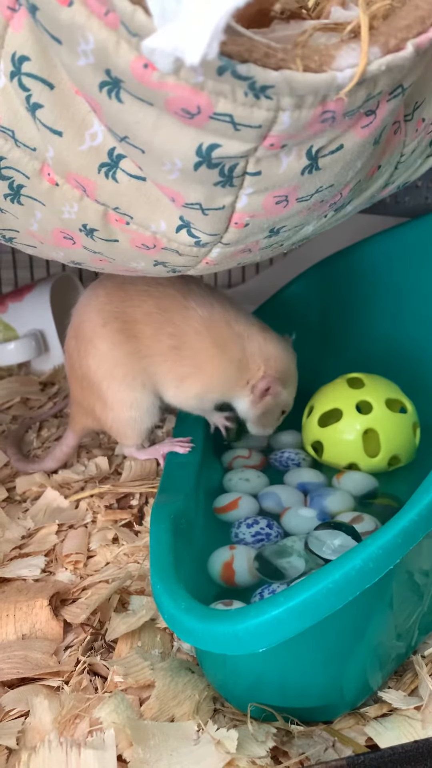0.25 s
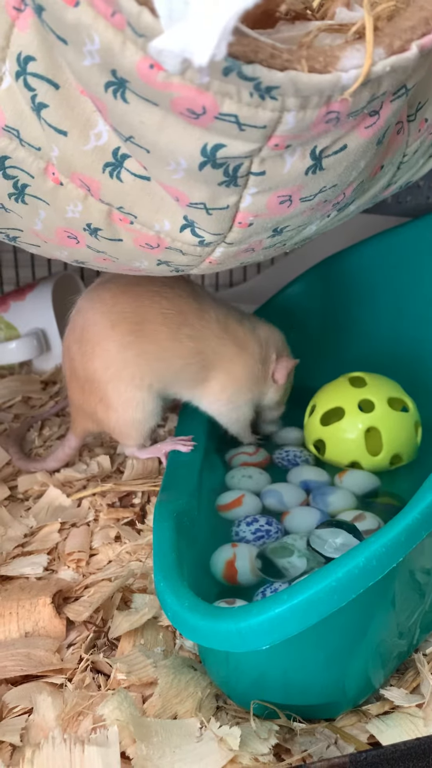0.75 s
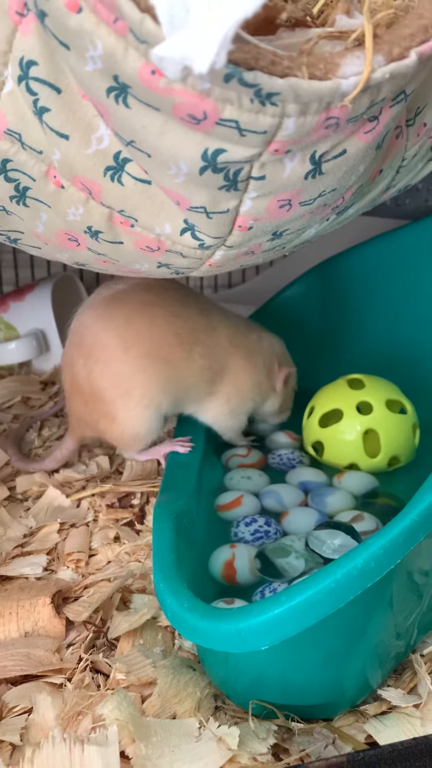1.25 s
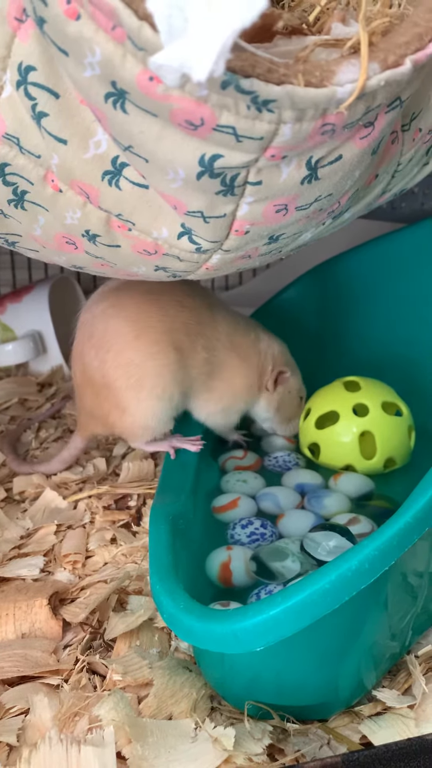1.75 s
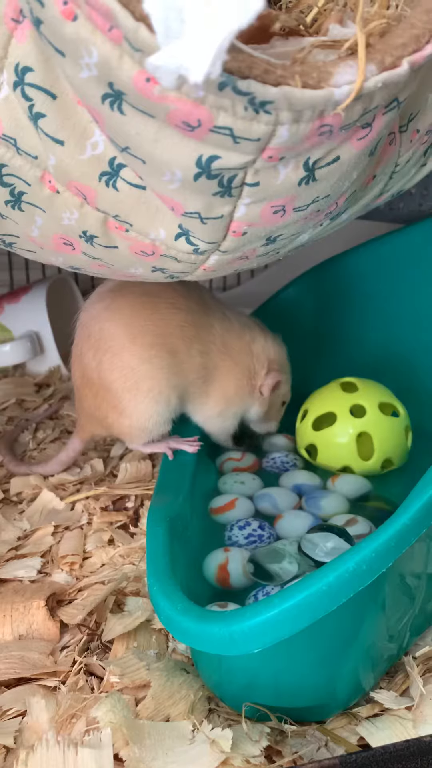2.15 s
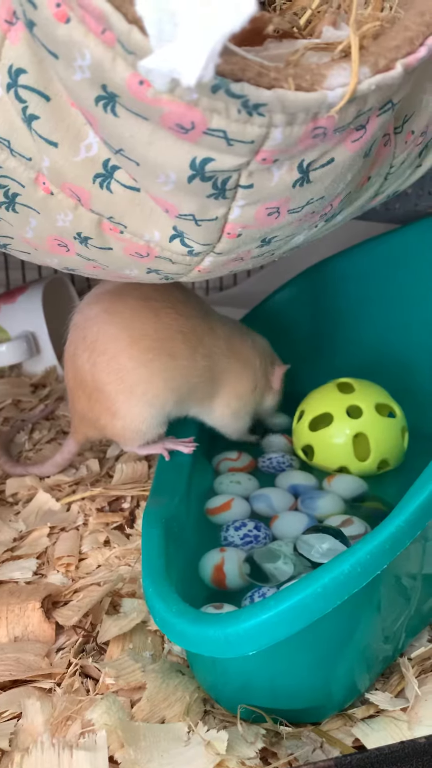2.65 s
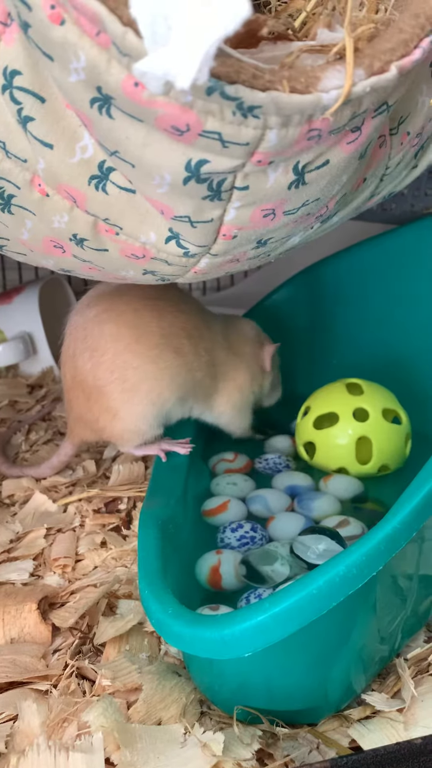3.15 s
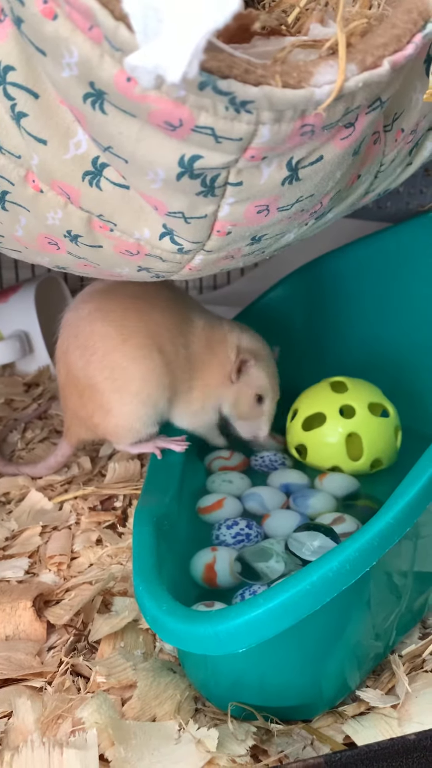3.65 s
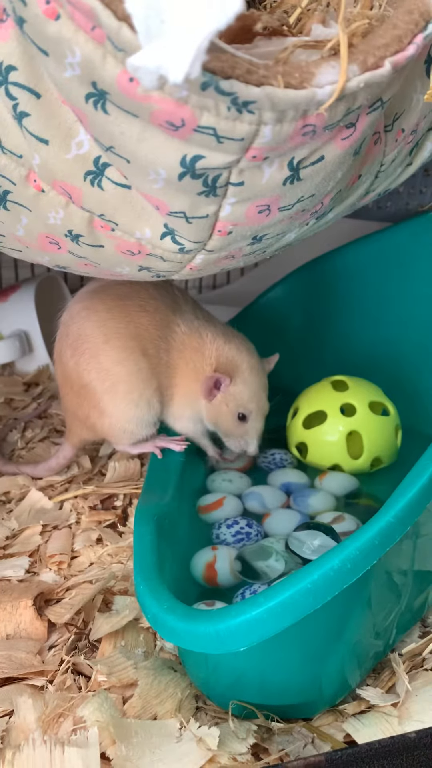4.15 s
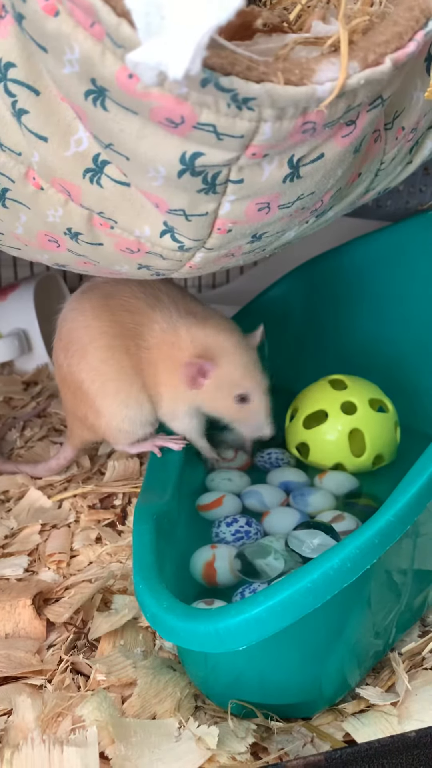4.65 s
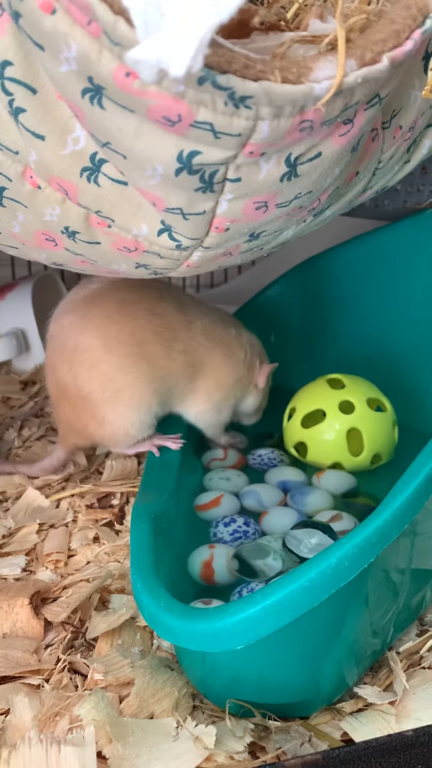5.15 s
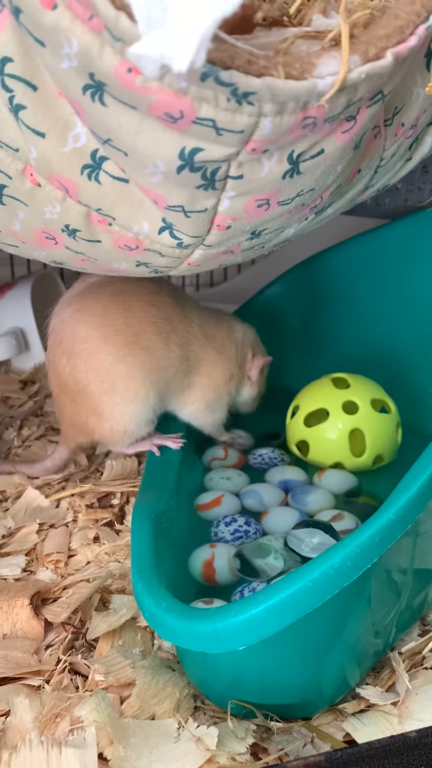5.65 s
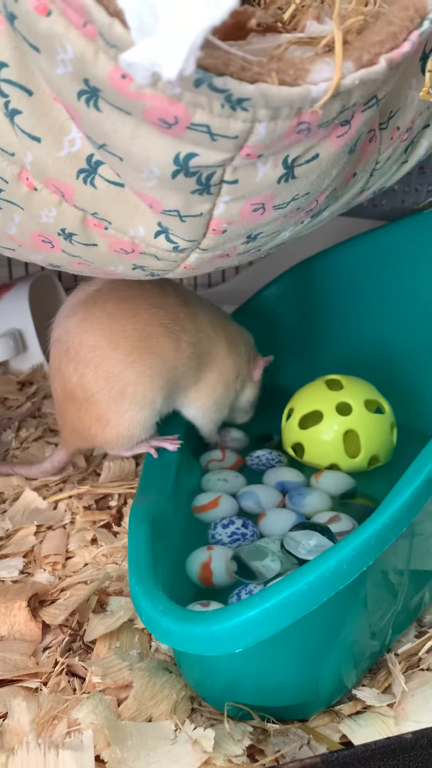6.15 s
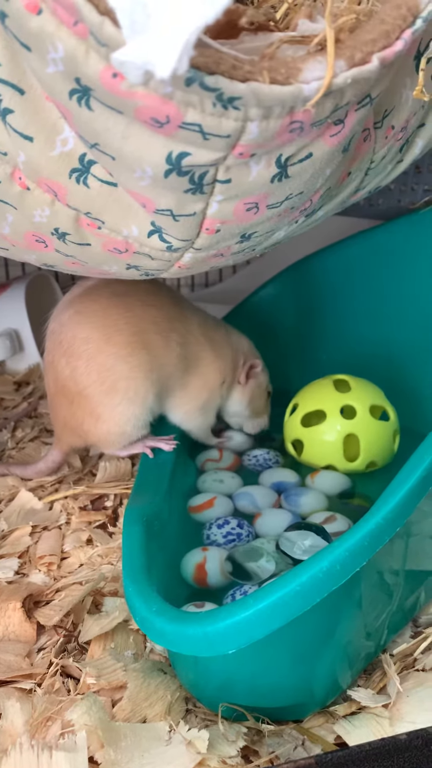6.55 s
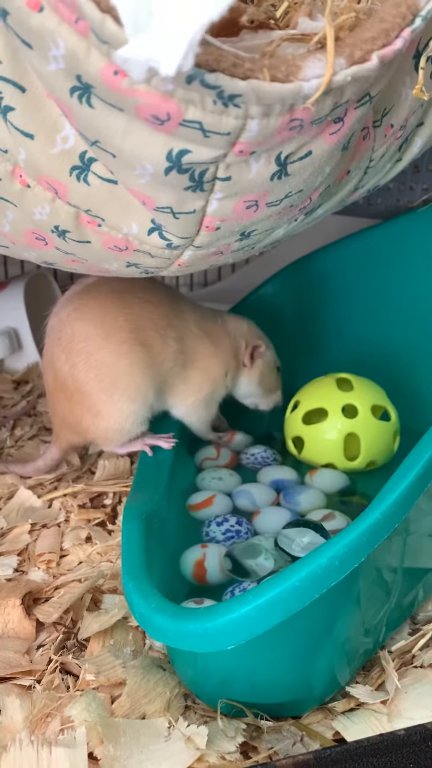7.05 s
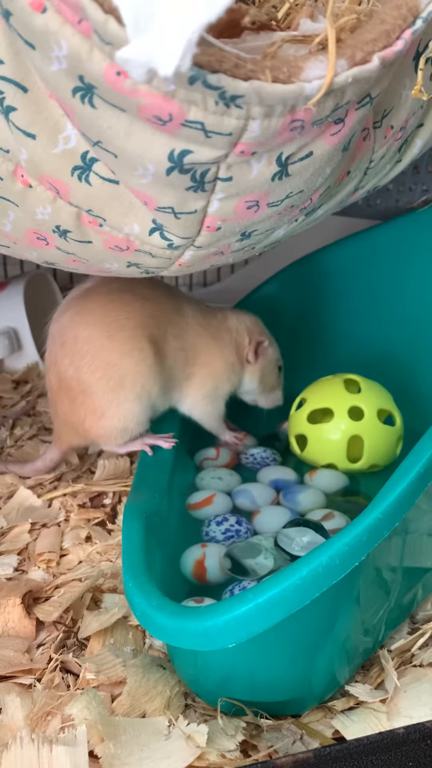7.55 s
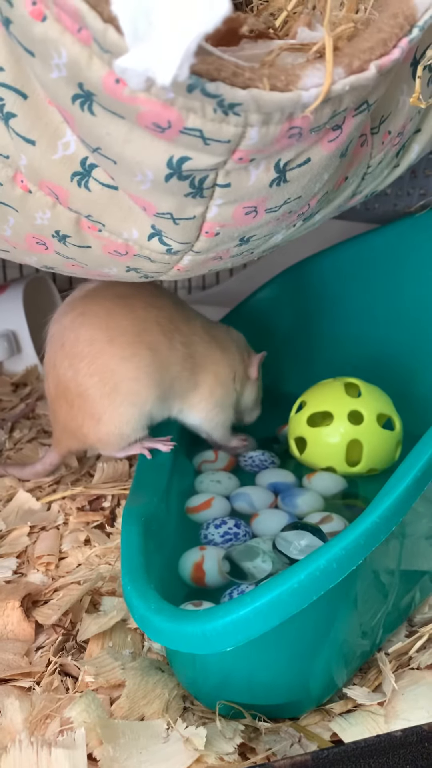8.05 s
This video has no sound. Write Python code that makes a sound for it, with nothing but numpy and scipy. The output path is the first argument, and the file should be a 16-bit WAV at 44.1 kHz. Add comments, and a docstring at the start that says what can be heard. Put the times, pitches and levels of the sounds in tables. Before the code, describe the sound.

Hard, bright marble clicks with short hollow tub knocks, heard by a near handheld stereo microphone. They are dense at first, then scattered singly and in pairs with short gaps, and burst again late before nearly stopping. Faint rattling rubs fill between, with rare tiny high ticks and dull bumps. The small room answers faintly over constant low hum and soft air noise.

```python
"""Paws among glass marbles

Indoors, close to a handheld camera with two microphone ports: a rat paws through glass marbles in a plastic
tub of shallow water. Each contact is a shaped noise click of dry glass and a knock: a falling chirp plus the
damped modes of the tub wall. A faint diffuse room tail answers. Behind it: a spinning machine and electric hum
as summed tones, a steady rush of air as filtered noise, and a few soft low thumps as swelling sines."""
import sys
import numpy as np
from scipy import signal
from scipy.fft import rfft, irfft
from scipy.io import wavfile
from scipy.ndimage import uniform_filter1d

SR = 44100
rng = np.random.default_rng(int(sys.argv[2]) if len(sys.argv) > 2 else 0)


def log_audio(samples):
    """Write samples as a 16-bit WAV file to the path given in sys.argv[1]."""
    # one column per channel
    frames = np.atleast_2d(samples).T
    # limit to full scale, then quantise
    limited = np.clip(frames, -1, 1)
    pcm = np.round(limited * 32767).astype(np.int16)
    wavfile.write(sys.argv[1], SR, pcm)


N = 366030  # length in samples

# Marble contacts: t/s, click energy/dB, upper corner of click f/Hz, click ring f/Hz, height of ring/dB,
# tub knock energy/dB, struck patch of wall f/Hz, low wall resonance/dB, upper wall resonance/dB
MARBLE_CONTACTS = [(0.0038, -1, 14200, 3700, 6.0, -2.5, 1750.0, 5.0, 2.5),
                   (0.0235, -12.0, 8100.0, 3300, 1, -15, 1220, -2, -3),
                   (0.032, -18, 4000.0, 3600.0, 11, -20, 730.0, 7, -3.0),
                   (0.116, -23.0, 5900.0, 4620.0, 6.0, -15, 1070.0, -6, 3.0),
                   (0.1216, -3.5, 12100, 2740, 5, -9.0, 1060, -7, 7.5),
                   (0.1277, -32, 3000.0, 2480.0, 8.0, -13.5, 525, 5, -5),
                   (0.1414, -38.0, 4000.0, 3460.0, 4.0, -22, 760.0, 6, 1.0),
                   (0.1486, -23, 5400.0, 4640.0, 13, -15, 630.0, 12, -10),
                   (0.326, -13, 10600, 3100.0, 3, -20, 1660, 4, 0),
                   (0.3302, -13, 4700.0, 6500, 0, -8.5, 1040, -2, 6),
                   (0.3557, -11.5, 8050, 2620.0, 7.0, -11, 1600, 3, -1),
                   (0.399, -28, 3900.0, 5520.0, 7.0, -28, 1290.0, -1.0, 0.0),
                   (0.4122, -29.0, 4400.0, 6120.0, 12, -21, 1760.0, 3, -3),
                   (0.4317, -18, 5000.0, 4330, 10.0, -17, 760.0, 5, -1.0),
                   (0.4684, -18, 5400.0, 3020.0, 4, -21.5, 1740.0, 1.0, 4.0),
                   (0.5378, -38.0, 4400.0, 4040.0, 5.0, -21, 1130.0, -2, 0.0),
                   (0.5904, -27, 6200.0, 3480.0, 5, -20, 1940.0, -7, -4),
                   (0.6367, -22, 5700.0, 4620.0, 6, -20, 540.0, 8, -7),
                   (0.6565, -25, 4100.0, 3420.0, 10, -14.5, 630.0, 9, 1),
                   (0.673, -35.5, 3800.0, 5240.0, 9.0, -16.5, 590.0, 8, 2),
                   (0.8212, -39, 6000.0, 6900.0, 8.0, -26, 1890.0, 3.0, 1.0),
                   (0.8337, -25.5, 4200.0, 3540.0, 7.0, -16, 1670.0, 9, 6),
                   (0.914, -22.5, 3900.0, 3520, 4, -21, 650.0, 4, -2.0),
                   (1.063, -31, 3300.0, 3980.0, 9.0, -25, 1990.0, -11, 3),
                   (1.1005, -22, 3700.0, 5080.0, 10, -24.5, 1990.0, 4, -3),
                   (1.208, -30.0, 3500.0, 4080.0, 9.0, -28, 1130.0, -10, 3.0),
                   (1.6835, -15, 7400.0, 3460.0, 11, -13.5, 620.0, -5, -4),
                   (1.7746, -28.0, 4100.0, 2780.0, 6.0, -29, 1300.0, 0.0, 3),
                   (1.8503, -22.5, 5000.0, 3480, 9, -18, 1270, 2, 8),
                   (1.914, -33.0, 4000.0, 3540.0, 8, -31, 1420.0, -8, 6),
                   (2.1346, -17, 5100.0, 3460.0, 5.5, -18, 666, -5, 1),
                   (2.345, -20.5, 4400.0, 6760.0, 7.0, -19, 1020.0, -4, 0),
                   (2.537, -26.5, 4400.0, 6240.0, 7, -18.0, 1080.0, 12, 1),
                   (2.6461, -17.5, 6140, 4400, 11, -19.0, 1140.0, 12, 5),
                   (2.6973, -21, 4700, 4300.0, 2, -16.5, 1020.0, 0, -7),
                   (2.84, -20.5, 8500, 3320.0, 4, -21, 1540.0, 10, 0),
                   (2.86, -14.5, 7260, 3500, 7, -10, 1000.0, -4, -4),
                   (3.1234, -26.5, 4900.0, 4900.0, 8.0, -19.5, 1090.0, 2, -13),
                   (3.2543, -15, 6700.0, 4180, 13, -15, 580.0, 5, 3.0),
                   (3.4016, -16.5, 8800.0, 4700.0, 16, -23, 810.0, 9, -1.0),
                   (3.746, -31, 4400.0, 5380.0, 7.0, -26.5, 580.0, 2.0, 1.0),
                   (3.9491, -22, 5800.0, 4980.0, 5, -12.5, 1080, 17.5, -7.0),
                   (4.0221, -19.5, 5770, 4600.0, 11, -13.5, 1110.0, 10, 10),
                   (4.3742, -25, 3200.0, 5220.0, 9.0, -23, 1840.0, 1.0, -1.0),
                   (4.3876, -15.5, 4400, 5100, 10.0, -16, 1130, 5, -2.0),
                   (4.5207, -16.0, 4630, 6650, 8, -13.5, 1240, 8, 8),
                   (4.6147, -28, 3400.0, 3640.0, 10, -18, 1800.0, -5, -3.0),
                   (5.27, -27, 4000.0, 5120.0, 8.0, -22.5, 1210, 10, 10),
                   (5.4199, -13, 5000.0, 2280.0, 11, -15.5, 1230, 3, -6),
                   (5.4472, -26, 5200.0, 5020.0, 5.0, -18.5, 1940.0, 5, 1.0),
                   (5.4539, -11, 6200, 4260.0, 12, -14.5, 920, 3, -2),
                   (6.2486, -21, 5300.0, 4340.0, 15, -22.5, 1160, 9, -3.0),
                   (6.432, -20.5, 4100.0, 3100, 8, -16.5, 1670.0, 4, -1),
                   (6.8714, -17, 6100.0, 4300, 13, -12, 1020.0, 5, 5),
                   (6.8802, -11, 7460, 2220, 8, -14.5, 1940.0, -9, 14),
                   (6.8822, -12.5, 5300.0, 3520.0, 16, -1, 1160, 8.0, 5),
                   (6.8927, -31, 3300.0, 3500.0, 4, -8, 670.0, 10, -9),
                   (6.9021, -33.0, 5000.0, 4980.0, 11.0, -13.5, 840.0, 6.0, 0.0),
                   (6.9093, -38.0, 3300.0, 2440.0, 4.0, -16, 720.0, 13, -7.0),
                   (6.988, -11.5, 4540, 7100, 9, -8.0, 520.0, 2, 6),
                   (7.0012, -34, 3700.0, 3740.0, 4.0, -15, 514, 0, -3),
                   (7.142, -32, 4000.0, 4770, 12.0, -20.5, 1070.0, 5, -3),
                   (7.22, -14, 6100.0, 3440, 8, -15, 1120.0, 5, -6.0),
                   (7.2276, -36, 3600.0, 3860.0, 4.0, -14.5, 1150, 13, 1),
                   (7.427, -42, 3000.0, 4740.0, 9.0, -23.5, 1090.0, 3, 2.0),
                   (7.9817, -22.5, 4600.0, 4840.0, 5, -21.5, 514, 4, -1.0)]
# Spells in which the paws roll and rub the marbles: from t/s, to t/s, base level of the touches/dB
RUBBING_SPELLS = [(0.029, 0.2, -41), (0.275, 0.7, -46.5), (0.8, 1.25, -55), (2.297, 2.95, -50),
                  (3.698, 4.64, -46.5), (5.247, 5.6, -44), (6.826, 7.3, -43)]
# Tiny high ticks, as of droplets bursting: t/s, energy/dB, centre f/Hz
HIGH_TICKS = [(1.1065, -40, 13500), (1.482, -26, 11700), (1.6618, -41, 12000), (3.4045, -32, 12300),
              (6.8807, -22.5, 11600), (7.1784, -35, 13800), (8.08, -32, 12400)]
# Soft low thumps: t/s, level relative to each other/dB, f/Hz
LOW_THUMPS = [(.88, -54, 45), (2.521, -48, 50), (2.62, -54, 48), (5.001, -41, 50.3), (6.86, -35, 55),
              (7.116, -29.5, 65.4), (7.153, -32.5, 53.4), (7.215, -43, 50), (7.315, -36.5, 52.6),
              (7.47, -37.5, 58.2), (7.7, -50, 45)]
# Colour of a hard glass contact: f/Hz, relative level/dB
GLASS_COLOUR = [(500, -16.5), (2000, 0), (2900, 0), (3450, 5), (3900, -2), (4250, 5), (5200, 2), (6200, 2),
                (8500, 3.5), (11500, -5), (13000, -10), (16000, -34)]
# Colour of the bending wave in the tub wall: f/Hz, relative level/dB
WALL_COLOUR = [(100, -44), (250, -11), (380, 3), (550, 1), (800, -4.5), (1100, 5.5), (1400, -1),
               (1800, 0.5), (2200, -3), (3200, -19), (6000, -38.5)]
# Modes of the tub with its water: f/Hz, relative level/dB, t60/s
TUB_MODES = [(223, 6.5, 0.049), (330, -9, 0.052), (450, -6, 0.052), (599, -7, 0.07), (692, -1, 0.065),
             (950, -12, .11), (1040, 1.5, 0.036), (1110, 5.5, 0.042), (1270, -7, 0.026), (1488, 2.5, 0.039),
             (1597, -9.5, 0.068), (1890, 2.5, 0.039), (2280, 5.5, 0.017), (2480, 6.5, 0.026)]
# Decay of the room: f/Hz, t60/s
ROOM_DECAY = [(200, 0.2), (1000, 0.11), (4000, 0.34), (8000, 0.26), (14000, 0.3)]
# Colour of the reverberation: f/Hz, level/dB
ROOM_COLOUR = [(200, -10.5), (600, -4), (1100, -13), (1800, -6), (2800, -6.5), (4300, -9), (6300, -8.5),
               (10000, -14.5), (14000, -15)]
# Orders of the spinning machine: multiple of its speed, level against the sixth/dB
SHAFT_ORDERS = [(6, 0), (8, -24), (12, -17), (14, -27), (18, -17), (20, -29), (24, -23), (30, -26),
                (42, -24), (44, -28), (61, -27)]
# Swell of the spinning machine: t/s, rms level of its sixth multiple/dB
SHAFT_SWELL = [(0.05, -41.5), (0.57, -47.5), (1.49, -44), (2.42, -45.5), (2.52, -44), (3.54, -43.5),
               (3.8, -42.5), (4.27, -47), (4.52, -44), (5.71, -48), (5.87, -43.5), (6.22, -43), (7.74, -46),
               (8.25, -43.5)]
# Steady electric hum: f/Hz, rms level/dB
ELECTRIC_TONES = [(77.64, -54), (100.0, -50.5), (122.4, -64), (346.05, -60.8)]
# Rush of air: f/Hz, level/dB per Hz
AIR_COLOUR = [(20, -101), (45, -84), (68, -72), (110, -84.5), (165, -87), (215, -82), (285, -87.5),
              (330, -81), (400, -83.5), (470, -84.5), (570, -81.5), (680, -86.5), (800, -88), (950, -84),
              (1100, -83.5), (1250, -85.5), (1400, -85.0), (1900, -85), (2250, -91.5), (2700, -93),
              (3400, -98), (4500, -101.3), (7000, -113.9), (12000, -120), (16000, -126)]
# Left-right likeness of the air and of the room tail: f/Hz, likeness (1 = alike)
STEREO_LIKENESS = [(130, 0.88), (350, 0.76), (800, 0.43), (2200, 0.046), (3600, 0.56), (4700, 1),
                   (12000, 1)]
# Phase between the two microphone ports: f/Hz, lead of the left/rad
LEFT_LEAD = [(0, 0), (150, 0), (450, -.5), (1300, -.4), (2100, .6), (2700, 2.0), (3700, 1.65), (4650, 3.14),
             (16300, 20.1)]
# Balance of the two microphone ports: f/Hz, left minus right/dB
LEFT_BALANCE = [(100, 0), (450, .6), (900, -2.2), (1450, -2.8), (2000, -.8), (3300, 0), (8000, -.6)]

# two broad resonances of the wall: centre and half width
LOW_HZ, LOW_OCTAVES, UPPER_HZ, UPPER_OCTAVES = 540, 0.81, 1800, 0.22
# after-contacts of a struck marble: delays, and energy of their knock against the blow's knock
SETTLE_FROM_S, SETTLE_TO_S, SETTLE_DB = 0.0066, 0.027, -20.5
# click of an after-contact: energy against its own knock, upper corner
SETTLE_GLASS_DB, SETTLE_CORNER_HZ = -9, 4300
BOUNCE_S = 0.018  # a harder blow bounces longer: settling time added by a knock of 0 dB
TAIL_BLEND_HZ = 1.7  # two random tails are blended in turn so neither colours every echo
SPIN_HZ = 11.183  # mean speed of the machine in turns a second
# a wandering tone that throbs against the highest electric tone: pitch, rms wander, rms level
BEAT_HZ, BEAT_WANDER_HZ, BEAT_DB = 357, 0.9, -63
EDGE_HZ = 16300  # upper band limit of the recorder

SIZE = 6144  # samples in one short sound
T = np.arange(SIZE) / SR
HZ = np.fft.rfftfreq(SIZE, 1 / SR)
ALL_HZ = np.fft.rfftfreq(N, 1 / SR)


def amp(db):
    """Decibels to gain."""
    return 10 ** (np.asarray(db) / 20)


def unit(x):
    """Scales a sound to energy 1."""
    return x / np.sqrt(np.sum(x ** 2) + 1e-30)


def read(points, hz):
    """Reads a table on a log-frequency axis."""
    f, value = np.transpose(points)
    return np.interp(np.log(hz + 1), np.log(f), value)


def add(mix, s, sound):
    """Adds a sound into the mix at a time in seconds."""
    part = mix[..., max(round(s * SR), 0):][..., :sound.shape[-1]]
    part += sound[..., :part.shape[-1]]


def causal(gain):
    """The minimum-phase spectrum: the most compact pulse with this colour."""
    cepstrum = irfft(np.log(np.maximum(gain / gain.max(), 1e-5)))
    cepstrum[1:SIZE // 2] *= 2
    cepstrum[SIZE // 2 + 1:] = 0
    return np.exp(rfft(cepstrum))


def bump(hz, octaves):
    """The shape of a resonance, of height 1."""
    return 1 / (1 + (np.log2((HZ + 1) / hz) / octaves) ** 2)


def scattered(decay_s, uneven):
    """Dense dying reflections, slightly different at each ear."""
    shared, left, right = rng.standard_normal((3, SIZE)) * np.exp(-T / decay_s)
    return np.array([unit(shared + uneven * own) for own in (left, right)])


def evenly(paths, size):
    """The spectrum of many paths that spread a pulse in time but keep its broad colour."""
    z = rfft(paths)
    power = uniform_filter1d((abs(z) ** 2).mean(0), size)
    return z * causal(power ** -0.5)


def drift(rate_hz):
    """A slow random wander of rms 1."""
    slow = rfft(rng.standard_normal(N)) * np.exp(-(ALL_HZ / rate_hz) ** 2)
    return np.sqrt(N) * unit(irfft(slow, N))


def stereo_pair(noise, hz):
    """Mixes two noise spectra so that left and right are as alike as the likeness table says."""
    left, other = noise
    same = np.clip(read(STEREO_LIKENESS, hz), 0, 1)[:, None]
    return np.array([left, same * left + np.sqrt(1 - same ** 2) * other])


def marbles(count=5):
    """Each contact clicks and knocks the tub, then settles in fainter contacts at random short delays."""
    out = np.zeros((2, N))
    for s, glass_db, corner_hz, ring_hz, ring_db, tub_db, patch_hz, low_db, upper_db in MARBLE_CONTACTS:
        glass = amp(glass_db) * click(corner_hz, ring_hz, ring_db)
        tub = amp(tub_db) * knock(patch_hz, low_db, upper_db)
        add(out, s, glass + tub)
        settle_click = amp(SETTLE_GLASS_DB) * click(SETTLE_CORNER_HZ, ring_hz, ring_db=0)
        settle = amp(tub_db + SETTLE_DB) * (knock(patch_hz) + settle_click)
        latest_s = SETTLE_TO_S + BOUNCE_S * amp(tub_db)
        for late in rng.uniform(SETTLE_FROM_S, latest_s, count):
            add(out, s + late, settle)
    return out


def click(corner_hz, ring_hz, ring_db, ring_width_hz=190, burst=1.0, burst_s=0.00076,
          scatter=1.0, scatter_s=0.003, uneven=0.21):
    """Glass contact: a pulse and its quick passage through touching marbles, a ring, scatter in the heap."""
    ring = ring_db / (1 + ((HZ - ring_hz) / ring_width_hz) ** 2)
    colour = amp(read(GLASS_COLOUR, HZ) + ring) / np.sqrt(1 + (HZ / corner_hz) ** 8)
    near = burst * unit(rng.standard_normal(SIZE) * np.exp(-T / burst_s))
    pulses = (T == 0) + near + scatter * scattered(scatter_s, uneven)
    # the root of 2 gives each channel energy 1 on average
    return np.sqrt(2) * unit(irfft(evenly(pulses, size=170) * causal(colour)))


def knock(patch_hz, low_db=0, upper_db=0, travel_s=0.001294, patch_db=6, patch_octaves=0.12,
          ring=0.8, ring_rise_s=0.0018, scatter=0.86, scatter_s=0.0048, detune=0.015, uneven=0.2):
    """Tub wall: a bending wave arrives as a falling chirp, then modes of random sign, strength and detune."""
    patch = patch_db * bump(patch_hz, patch_octaves)
    low = low_db * bump(LOW_HZ, LOW_OCTAVES)
    upper = upper_db * bump(UPPER_HZ, UPPER_OCTAVES)
    colour = amp(patch + low + upper)
    # bending waves speed up with the root of frequency; the highest arrive nearly with the click
    lag_s = travel_s * (2 * np.sqrt(1000 / np.clip(HZ, 100, 3300)) - 1)
    # phase is the running sum of the delay over frequency
    wave = causal(amp(read(WALL_COLOUR, HZ))) * np.exp(-2j * np.pi * np.cumsum(lag_s) * HZ[1])
    paths = evenly((T == 0) + scatter * scattered(scatter_s, uneven), size=56)
    hz, db, t60 = np.transpose(TUB_MODES)[:, :, None]
    place, shift = rng.standard_normal((2, len(TUB_MODES), 1))
    # a random place sets how strongly, and with which sign, each mode is driven
    strength = np.tanh(2 * place) * amp(db - 60 * T / t60)
    modes = strength * np.sin(2 * np.pi * hz * (1 + detune * shift) * T)
    ringing = unit(modes.sum(0) * (1 - np.exp(-T / ring_rise_s)))
    body = np.sqrt(2) * unit(irfft(paths * wave)) + ring * ringing
    coloured = irfft(rfft(body) * causal(colour))
    fade_out = 1 - (T / T[-1]) ** 2
    return np.sqrt(2) * unit(coloured * fade_out)


def nudges(touches_per_s=75, glass_db=-10, spread_db=4, corner_hz=3400, count=8):
    """Rolling marbles touch faintly and often, at a few places in the tub."""
    places = []
    for _ in range(count):
        glass = amp(glass_db) * click(corner_hz, rng.uniform(3000, 5200), ring_db=2)
        places.append(glass + knock(rng.uniform(740, 1520)))
    out = np.zeros((2, N))
    for start, end, db in RUBBING_SPELLS:
        slots = np.arange(start, end, 1 / touches_per_s)
        for slot, (late, force, place) in zip(slots, rng.random((len(slots), 3))):
            level = amp(db + spread_db * (2 * force + 1.5))  # 6 to 14 dB above the base level
            add(out, slot + late / touches_per_s, level * places[int(place * count)])
    return out


def ticks(decay_s=0.001, width_hz=2200):
    """Very short, very high bursts: dying noise through a narrow band."""
    out = np.zeros(N)
    for s, db, hz in HIGH_TICKS:
        burst = rfft(rng.standard_normal(SIZE) * np.exp(-T / decay_s))
        band = causal(1 / (1 + ((HZ - hz) / width_hz) ** 4))
        add(out, s, amp(db) * unit(irfft(burst * band)))
    return out


def room(x, onset_s=0.0017, early=1.0, early_s=0.025):
    """A diffuse tail from cage and room, each band dying at its own speed."""
    hz, t, noise = signal.stft(rng.standard_normal((2, SR // 2)), SR, nperseg=256)
    z = stereo_pair(noise, hz)
    fade = amp(-60 * t / read(ROOM_DECAY, hz)[:, None]) * (1 - np.exp(-(t / onset_s) ** 2))
    fade *= 1 + early * np.exp(-(t / early_s) ** 4)  # the near walls answer first and loudest
    fade /= np.sqrt(np.sum(fade ** 2, 1, keepdims=True) * t[1] * SR)  # equal energy in every band
    colour = amp(read(ROOM_COLOUR, hz))[:, None]
    tail = signal.istft(z * fade * colour, SR, nperseg=256)[1]
    return signal.fftconvolve(x.mean(0)[None], tail, axes=1)[:, :N]


def thumps(level_db=-2, rise_s=0.016):
    """Dull low pushes: sines that swell and die within a few cycles."""
    out = np.zeros(N)
    swell = T / rise_s * np.exp(1 - T / rise_s)
    for s, db, hz in LOW_THUMPS:
        add(out, s, amp(db + level_db) * swell * np.sin(2 * np.pi * hz * T))
    return out


def hum(waver=0.00041):
    """Orders of a slightly wavering shaft and one wandering tone beat against steady electric tones."""
    t = np.arange(N) / SR
    turns = np.cumsum(SPIN_HZ * (1 + waver * drift(0.76))) / SR
    spin = sum(amp(db) * np.cos(2 * np.pi * (round(k) * turns + rng.random())) for k, db in SHAFT_ORDERS)
    spin = spin * amp(np.interp(t, *np.transpose(SHAFT_SWELL)))
    electric = sum(amp(db) * np.cos(2 * np.pi * (hz * t + rng.random())) for hz, db in ELECTRIC_TONES)
    beat_cycles = np.cumsum(BEAT_HZ + BEAT_WANDER_HZ * drift(1.0)) / SR
    beating = amp(BEAT_DB) * np.cos(2 * np.pi * beat_cycles)
    return np.sqrt(2) * (spin + electric + beating)  # peak from rms


def air(swell_db=0.19, patchy_db=1.97):
    """A steady noise rush with slight eddies, its left-right likeness changing with frequency."""
    hz, t, noise = signal.stft(rng.standard_normal((2, N)), SR, nperseg=1024)
    z = stereo_pair(noise, hz)
    eddies = uniform_filter1d(rng.standard_normal(z[0].shape), size=3, axis=0)  # smooth over frequency
    eddies = uniform_filter1d(eddies, size=6, axis=1)  # and over time
    patches = amp(patchy_db * eddies / eddies.std())
    rush = signal.istft(z * patches, SR, nperseg=1024)[1][:, :N]
    colour = amp(read(AIR_COLOUR, ALL_HZ)) * np.sqrt(SR / 2)  # level per Hz to white-noise gain
    return irfft(rfft(rush) * colour, N) * amp(swell_db * drift(1.3))


def ports(x):
    """Sound reaches the two microphone ports with a different phase and strength."""
    half_balance = read(LEFT_BALANCE, ALL_HZ) * np.array([[0.5], [-0.5]])
    z = rfft(x * np.ones((2, 1))) * amp(half_balance)
    z[1] *= np.exp(-1j * np.interp(ALL_HZ, *np.transpose(LEFT_LEAD)))
    return irfft(z, N)


def scene():
    """The tub up close in a humming room, with a faint diffuse room tail, heard at both ports."""
    tub = marbles() + nudges() + ticks()
    # two random tails are blended in turn so neither colours every echo
    blend = 2 * np.pi * TAIL_BLEND_HZ * np.arange(N) / SR
    echoes = room(tub * np.cos(blend)) + room(tub * np.sin(blend))
    return ports(tub + echoes + thumps() + hum() + air())


def record(dry):
    """The band limit of the recorder: a steep linear-phase low-pass."""
    low_pass = signal.firwin(511, EDGE_HZ, window=("kaiser", 9), fs=SR)
    return signal.oaconvolve(dry, low_pass[None], "same")


dry = scene()
out = record(dry)
log_audio(out)
```